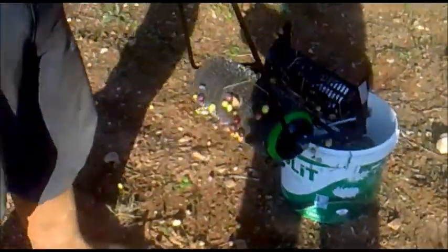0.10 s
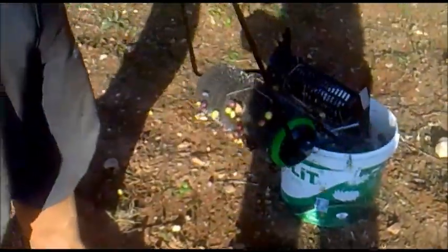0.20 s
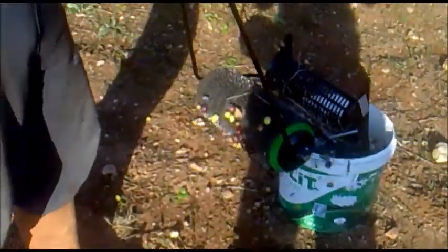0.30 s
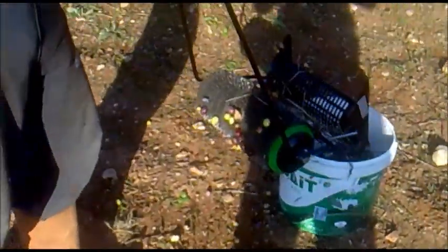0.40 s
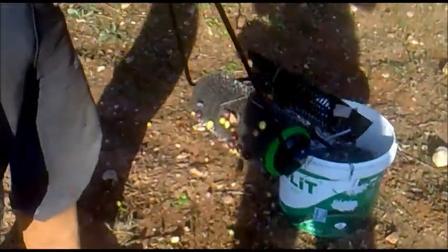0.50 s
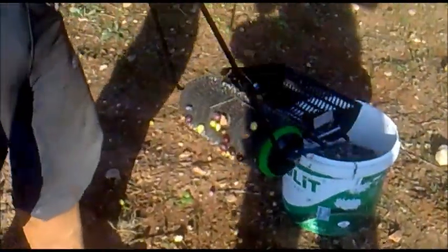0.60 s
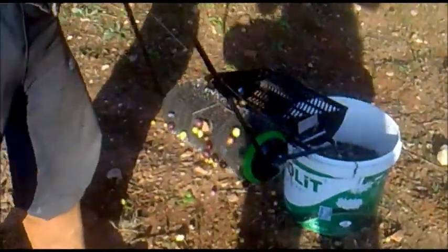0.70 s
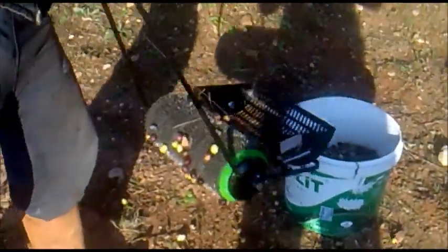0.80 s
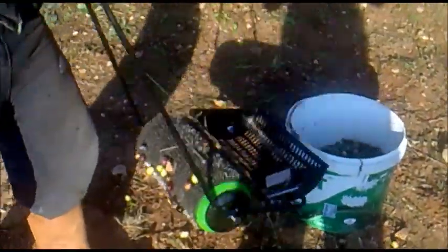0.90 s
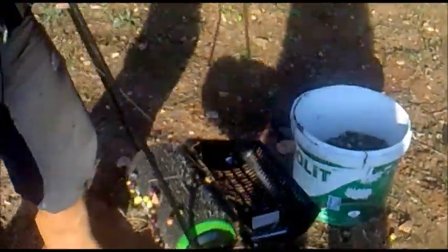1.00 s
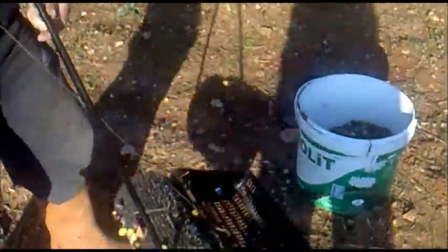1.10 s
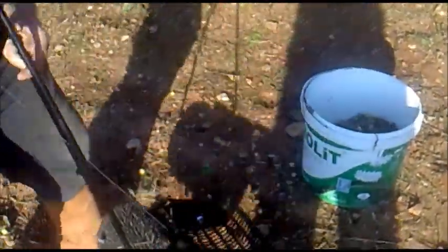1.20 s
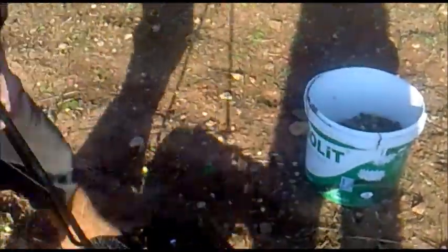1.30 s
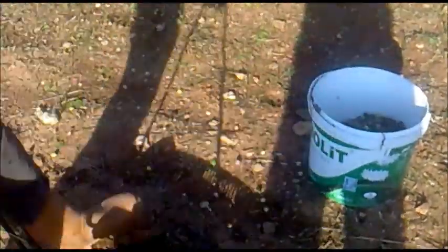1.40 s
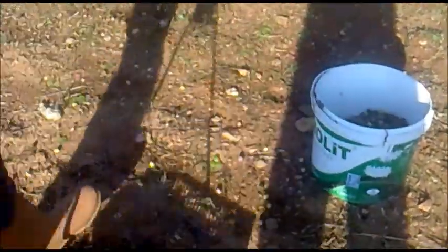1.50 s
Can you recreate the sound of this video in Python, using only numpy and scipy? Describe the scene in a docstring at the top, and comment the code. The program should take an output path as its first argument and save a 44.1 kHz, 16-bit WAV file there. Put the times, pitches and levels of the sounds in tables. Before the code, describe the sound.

A plastic olive roller cage hits a bucket rim with a hollow knock and loose clatter, thins out, cracks once when lifted, then its metal frame clangs and jingles in fading bounces; open air, phone microphone, faint wind rumble.

```python
"""Outdoors, a plastic olive cage on a metal handle knocks on the rim of a plastic bucket; olives clatter.
Lifted away, its plastic cracks once, then the metal frame clangs and bounces a few times.
Bucket and frame are sets of dying sine tones, and the plastic gives short tones with noisy crunch.
Filtered noise makes the frame's sizzle, sliding dust, faint air and light wind on a phone microphone."""
import sys
import numpy as np
from scipy import signal
from scipy.fft import rfft, irfft
from scipy.io import wavfile
from scipy.ndimage import uniform_filter1d

SR = 44100
rng = np.random.default_rng(int(sys.argv[2]) if len(sys.argv) > 2 else 0)


def to_wav(s):
    """Save 16-bit WAV."""
    ch = np.atleast_2d(s).T  # columns
    pcm = np.round(np.clip(ch, -1, 1) * 32767)  # PCM
    wavfile.write(sys.argv[1], SR, pcm.astype(np.int16))


N = 66150  # samples: 1.5 s

# In all names, T60 is the time a sound takes to fade by 60 dB.
# Steady outdoor air: f/Hz, level/dB
AIR_COLOUR = [(20, 3.5), (551, -12), (1180, -20), (1430, -22), (1900, -23.5), (3940, -30.5), (14700, -31.5),
              (16500, -46.5)]
AIR_DB = -63.5

# Loudness of the wind rumble: t/s, level/dB
WIND_LEVEL = [(0, -61), (.19, -91), (.225, -64), (.3, -67), (.38, -68), (.55, -55.5), (.65, -44.5),
              (.72, -62), (.78, -36.5), (.83, -44), (1.04, -59.5), (1.1, -47), (1.2, -56), (1.37, -57.5),
              (1.5, -75)]
# Tone colour of the wind rumble: f/Hz, level/dB
WIND_COLOUR = [(15, -22), (32, 7), (85, -2), (162, -11), (250, -21.5), (340, -63)]
# Soft pushes of air on the microphone: centre t/s, level/dB (before dip and swell overlap), half width/s
PUSHES = [(.6300, -23.5, 0.0021), (0.658, -19.5, 0.003), (0.78, -22.5, 0.0031), (0.894, -27.5, 0.0027)]

# Dry soil and dust sliding off the cage: t/s, level/dB
GRIT_LEVEL = [(.212, -64.5), (.22, -56), (.45, -62.5), (.75, -53.5), (.77, -50), (1.0, -67.5)]
GRIT_FROM_HZ = 2400

# Loudness of the loose clatter, before the lift thins it: t/s, level/dB
CLATTER_LEVEL = [(.08, -74.5), (.212, -58.5), (.218, -23), (.29, -34.5), (.325, -32.5), (.39, -34),
                 (.44, -35), (.47, -39), (.5, -35.5), (.59, -43), (.68, -51), (.755, -54), (.765, -19.5),
                 (.80, -31), (.88, -48.5), (1.0, -56.5), (1.055, -62), (1.08, -46), (1.3, -55.5),
                 (1.45, -67.5)]
# Tone colour of clatter and crunch: f/Hz, level/dB
CLATTER_COLOUR = [(180, -18.5), (300, -10), (480, -17.5), (700, -13), (1050, -17.5), (1400, -14),
                  (2500, -15), (4600, -36), (5800, -33), (9400, -37.5), (16000, -54)]
CLATTER_PER_S, CLATTER_SPREAD_DB, CLATTER_T60_S = 750, 3.6, .014
LIFT_S, LIFT_DB, BODY_HZ = 0.763, -9, 970  # off the bucket the clatter loses its low body

# Olives and cage bars tapping plastic: t/s, level/dB, pitch f/Hz
TAPS = [(0.2143, -8, 2020), (0.2180, -7.5, 1305), (0.2563, -14.5, 1375), (.2800, -24, 1960),
        (0.3146, -12.5, 1380), (0.3329, -22.5, 2195), (0.336, -24, 1320), (0.4, -18.5, 1420),
        (0.4068, -22.5, 1354), (0.412, -27.5, 1890), (.4770, -27.5, 1540), (.4880, -25.5, 1400),
        (0.495, -20, 1480), (.4980, -28, 2170), (0.5108, -21.5, 1306), (0.513, -24.5, 2010),
        (0.525, -27, 1430), (.5470, -40, 2250), (0.5683, -28, 1350), (0.5971, -31.5, 1480),
        (0.607, -33.5, 2170), (0.632, -31.5, 860), (0.7609, -6, 1953), (0.7619, -7.5, 1494),
        (0.7637, -12, 2034), (0.772, -20.5, 2470), (.7770, -19, 2420), (0.782, -30.5, 1410),
        (0.8192, -26, 2100), (0.821, -31, 1530), (0.922, -38, 1820), (0.926, -38.5, 1490),
        (0.9328, -29, 1510), (0.9434, -30, 1880), (0.976, -38.5, 1730)]
# Ways the plastic vibrates: multiple of pitch, level/dB
PLASTIC_MODES = [(1, -2.5), (1.2, -16), (.78, -17)]
TAP_PEAK_S = 0.0022  # a single tap swells this long, then dies
CRUNCH_DB = -16  # broad rattle of the bars inside each tap

# Knocks on the bucket: t/s, level/dB, pitch f/Hz, T60/s
KNOCKS = [(.2150, -7, 287.5, 0.056), (0.229, -14, 268.4, 0.047), (.2580, -31, 268, 0.11),
          (0.333, -14, 261.7, 0.063), (0.378, -28, 262, 0.15), (0.766, -32, 325.5, 0.13),
          (.7610, -26, 540, 0.048)]
# Ways the bucket wall vibrates: multiple of pitch, level/dB, share of the knock's T60
BUCKET_MODES = [(1, 8, 0.64), (.6, -7.5, 0.95), (.28, -11.5, 0.95), (1.25, -18, 1), (2.5, -7, 0.65),
                (2.95, -8.5, 0.51)]
KNOCK_RISE_S = 0.0049
KNOCK_SHAPE = 1.5  # over 1: the ring is damped ever faster

# Strikes on the metal frame:
# t/s, ring level/dB, favoured f/Hz, spread/octaves, sizzle level/dB, sizzle T60/s, sizzle top f/Hz
STRIKES = [(0.2152, -23.5, 1760, 0.54, -44.5, 0.42, 14100), (0.2596, -25.5, 2630, 0.16, -37, 0.22, 14100),
           (0.3103, -44, 2000, 0.92, -36, 0.17, 12300), (0.332, -29, 1675, 0.08, -28.5, 0.17, 13000),
           (0.38, -34.5, 2740, 0.37, -33, 0.11, 13400), (0.607, -46, 2020, 0.38, -51, 0.15, 8160),
           (.7595, -23.5, 1465, 0.1, -15, 0.068, 12100), (.9440, -52, 3000, 0.27, -54, 0.031, 8000),
           (1.0658, -21.5, 2330, 0.7, -17, 0.077, 12820), (1.0880, -22.5, 1730, 0.17, -31, 0.018, 10150),
           (1.1500, -26.5, 2570, 0.067, -36.5, 0.11, 9620), (1.153, -31, 5975, .04, -34, 0.064, 9000),
           (1.19, -36, 2380, 0.37, -39, 0.086, 9400), (1.2651, -34, 2428, 0.069, -39, 0.092, 7920),
           (1.281, -39.5, 3165, 0.072, -41.5, 0.094, 8220)]
# Pitches at which the frame rings: f/Hz
FRAME_HZ = [940, 1283, 1420, 1604, 1630, 1906, 1986, 2052, 2223, 2365, 2428, 2550, 2670, 2740, 2880, 3149,
            3270, 3381, 3677, 3784, 3914, 5975, 6444, 6993, 7865]
# How each of those pitches rings, in the same order: level/dB, T60/s
FRAME_MODES = [(-7.5, .2), (-6, 0.58), (-10.5, 0.82), (-1.5, 0.34), (-21, .6), (-15.5, 0.13), (-3, 0.29),
               (-15, 1.0), (-12, 0.12), (-9.5, 0.19), (-7, 0.58), (-15.5, .18), (-12, 0.25), (-13, 0.43),
               (-13.5, 0.59), (-15.5, 0.38), (-6, 0.3), (-3.5, 0.25), (-12, .16), (-2, 0.27), (-6.5, 0.31),
               (-6.5, 0.074), (-11.5, 0.082), (-5.5, 0.039), (-10.5, 0.064)]
# Tone colour of the sizzle, the frame's dense upper modes: f/Hz, level/dB
SIZZLE_COLOUR = [(1200, -30.5), (1600, -12.5), (2500, -7.5), (3800, -7), (4600, -20), (5500, -6),
                 (6200, -8), (7500, -12), (9000, -10.5), (11000, -25), (16000, -10.5)]
SIZZLE_FROM_HZ = 5000  # frame modes above this sound at least as strongly as the sizzle level asks
SIZZLE_TAIL_DB, SIZZLE_TAIL_T60_S = -21, 0.4
STRIKE_RISE_S = 0.0017
MODE_SCATTER_DB = 1.5  # a strike never lands on quite the same spot
CRACK_DB, CRACK_T60_S = 7.5, 0.004  # first contact, relative to a sizzle of 0 dB
CRACK_FALL = 0.23  # weaker strikes lose this many dB of crack per dB of sizzle
MUTE_S, MUTE_HZ, MUTE_DB = 1.336, 2428, -18  # a touch quiets one ringing rod
# Loose rods brush each other and waver; longer rings hang free and waver less
FLUTTER_DB, FLUTTER_S, FREE_T60_S = 3.5, .01, .35

EDGE_HZ = 16150  # top of the recorder's range


def amp(db):
    """Turns decibels into a plain multiplier."""
    return 10 ** (np.asarray(db) / 20)


def evened(x):
    """Scales a sound to an average strength (rms) of 1."""
    return x / np.sqrt(np.mean(x ** 2) + 1e-20)


def curve(points):
    """Joins (t/s, value) points with straight lines, giving a value at every sample."""
    return np.interp(np.arange(N) / SR, *np.transpose(points))


def add(mix, s, sound):
    """Adds a sound into the mix from time s, cutting off what runs past the end."""
    part = mix[..., round(s * SR):][..., :sound.shape[-1]]
    part += sound[..., :part.shape[-1]]


def coloured(x, points):
    """Gives a sound the tone colour of (f/Hz, level/dB) points, at rms 1."""
    f, db = np.transpose(points)
    hz = np.fft.rfftfreq(len(x), 1 / SR)
    # pitch is heard in ratios, so the points are joined on a log scale
    colour_db = np.interp(np.log(hz + 1), np.log(f + 1), db)
    return evened(irfft(rfft(x) * amp(colour_db), len(x)))


def ring(modes, length, rise, shape=0.88):
    """Struck objects ring in modes: one dying sine per row of f/Hz, level/dB, T60/s."""
    t = np.arange(round(length * SR)) / SR
    hz, db, t60 = np.transpose(modes)[:, :, None]
    fade = amp(db - 60 * (t / t60) ** shape)
    onset = 1 - np.exp(-t / rise)
    return fade * np.sin(2 * np.pi * hz * t) * onset


def outdoor_air():
    """Faint steady background: noise that is strongest in the low pitches."""
    return amp(AIR_DB) * coloured(rng.standard_normal(N), AIR_COLOUR)


def wind():
    """Air pushing on the microphone: low lumpy rumble and single pushes, each a dip in a broad swell."""
    t = np.arange(N) / SR
    out = coloured(rng.standard_normal(N), WIND_COLOUR) * amp(curve(WIND_LEVEL))
    for s, db, half_width in PUSHES:
        u = (t - s) / half_width
        dip = np.exp(-u ** 2)
        swell = 0.48 * np.exp(-(u / 2.5) ** 2)
        out -= amp(db) * (dip - swell)
    return out


def grit():
    """Sliding dust makes a smooth high hiss: noise with its low part removed."""
    high = signal.butter(2, GRIT_FROM_HZ, "high", fs=SR, output="sos")
    hiss = evened(signal.sosfilt(high, rng.standard_normal(N)))
    return amp(curve(GRIT_LEVEL)) * hiss


def clatter():
    """Many small random taps, each ringing its own spot of the cage: a short tone in some crunch."""
    # most taps are small and a few stand out
    size = amp(CLATTER_SPREAD_DB * np.minimum(rng.exponential(1, N), 3))
    size *= rng.random(N) < CLATTER_PER_S / SR  # silent wherever no tap happens
    spot = rng.integers(0, 24, N)
    t, out = np.arange(3000) / SR, np.zeros(N)
    for k, hz in enumerate(np.geomspace(1250, 2500, 24)):
        tone = amp(-5.5) * np.sin(2 * np.pi * hz * t) * np.minimum(t / TAP_PEAK_S, 1)
        crunch = rng.standard_normal(len(t))
        grain = (crunch + tone) * amp(-60 * t / CLATTER_T60_S)
        # place a copy of this spot's grain at each of its taps
        out += signal.oaconvolve(size * (spot == k), grain)[:N]
    out = coloured(out, CLATTER_COLOUR)
    low = signal.butter(3, BODY_HZ, fs=SR, output="sos")
    body = signal.sosfiltfilt(low, out)
    body_kept = amp(curve([(LIFT_S - .02, 0), (LIFT_S + .02, LIFT_DB)]))
    return (out - (1 - body_kept) * body) * amp(curve(CLATTER_LEVEL))


def taps():
    """Single hard taps on the plastic cage: each a tone with some crunch that swells and dies."""
    out, t = np.zeros(N), np.arange(1000) / SR
    swell = (t / TAP_PEAK_S * np.exp(1 - t / TAP_PEAK_S)) ** 2
    for s, db, hz in TAPS:
        tone = sum(amp(d) * np.sin(2 * np.pi * hz * m * t) for m, d in PLASTIC_MODES)
        crunch = amp(CRUNCH_DB) * coloured(rng.standard_normal(len(t)), CLATTER_COLOUR)
        add(out, s, amp(db) * swell * (tone + crunch))
    return out


def bucket():
    """Hollow knocks: each sets the bucket wall ringing in several modes tied to one pitch."""
    out = np.zeros(N)
    for s, db, hz, t60 in KNOCKS:
        modes = [(hz * multiple, db + d, t60 * share) for multiple, d, share in BUCKET_MODES]
        add(out, s, ring(modes, 0.57, KNOCK_RISE_S, KNOCK_SHAPE).sum(0))
    return out


def frame():
    """Each strike rings the rod modes near its favoured pitch, with a burst of dense upper modes."""
    hz, t = np.array(FRAME_HZ), np.arange(SR // 2) / SR
    db, decay = np.transpose(FRAME_MODES)
    rods, sizzle = np.zeros((len(hz), N)), np.zeros(N)
    scatter = MODE_SCATTER_DB * rng.standard_normal((len(STRIKES), len(hz)))
    for k, (s, ring_db, near_hz, spread, sizzle_db, t60, top_hz) in enumerate(STRIKES):
        # modes far from the favoured pitch are up to 30 dB weaker
        distance = np.log2(hz / near_hz) / spread
        lean_db = ring_db - 30 * np.tanh(distance ** 2 / 5)
        drive_db = np.where(hz > SIZZLE_FROM_HZ, np.maximum(sizzle_db, lean_db), lean_db)
        level = db + scatter[k] + drive_db
        add(rods, s, ring(np.transpose([hz, level, decay]), 0.86, STRIKE_RISE_S))

        burst = amp(-60 * t / t60)
        tail = amp(SIZZLE_TAIL_DB - 60 * t / SIZZLE_TAIL_T60_S)
        crack = amp(CRACK_DB + CRACK_FALL * sizzle_db - 60 * t / CRACK_T60_S)
        onset = np.minimum(t / STRIKE_RISE_S, 1)
        dull = signal.butter(5, top_hz, fs=SR, output="sos")
        hiss = signal.sosfilt(dull, coloured(rng.standard_normal(len(t)), SIZZLE_COLOUR))
        add(sizzle, s, amp(sizzle_db) * hiss * (burst + tail + crack) * onset)

    # smoothing noise twice gives a slow, uneven waver for each rod mode
    span = round(FLUTTER_S * SR)
    smooth = uniform_filter1d(uniform_filter1d(rng.standard_normal(rods.shape), span), span)
    looseness = np.minimum(FREE_T60_S / decay, 1)[:, None] ** 2
    waver_db = FLUTTER_DB * evened(smooth) * looseness
    mute_db = np.outer(hz == MUTE_HZ, curve([(MUTE_S, 0), (MUTE_S + .006, MUTE_DB)]))
    return sizzle + (rods * amp(waver_db + mute_db)).sum(0)


def scene():
    """All the sounds simply add up, as one channel."""
    air = outdoor_air()
    cage_and_bucket = bucket() + taps() + clatter() + frame()
    return (cage_and_bucket + grit() + wind() + air)[None]


def record(dry):
    """The band limit of the recorder: pitches above its range are filtered away."""
    low_pass = signal.firwin(255, EDGE_HZ, window=("kaiser", 9), fs=SR)
    return signal.oaconvolve(dry, low_pass[None], "same")


dry = scene()
out = record(dry)
to_wav(out)
```